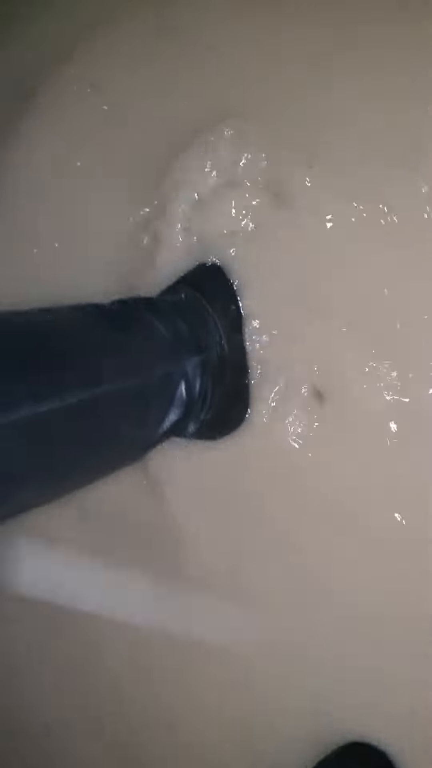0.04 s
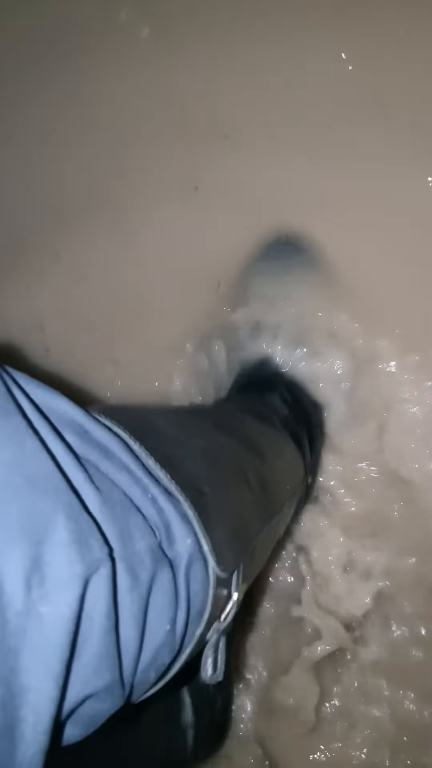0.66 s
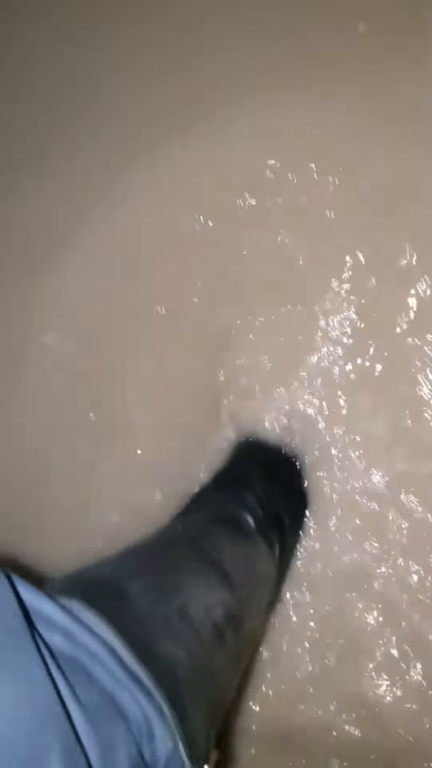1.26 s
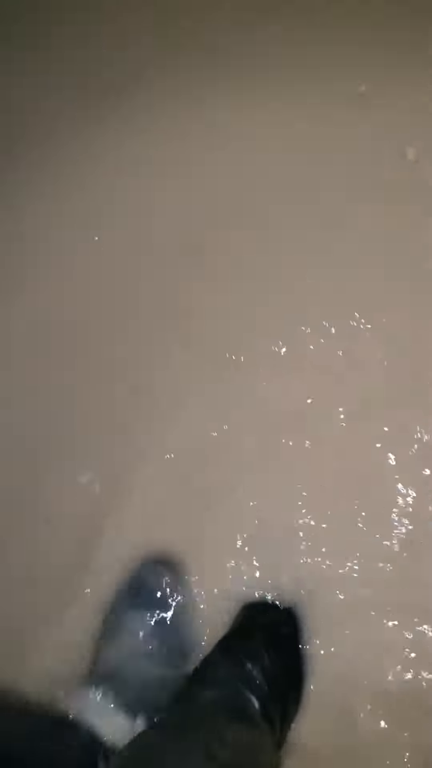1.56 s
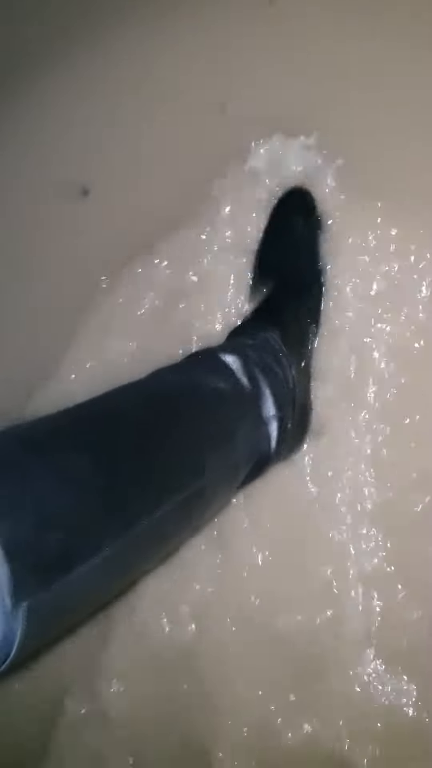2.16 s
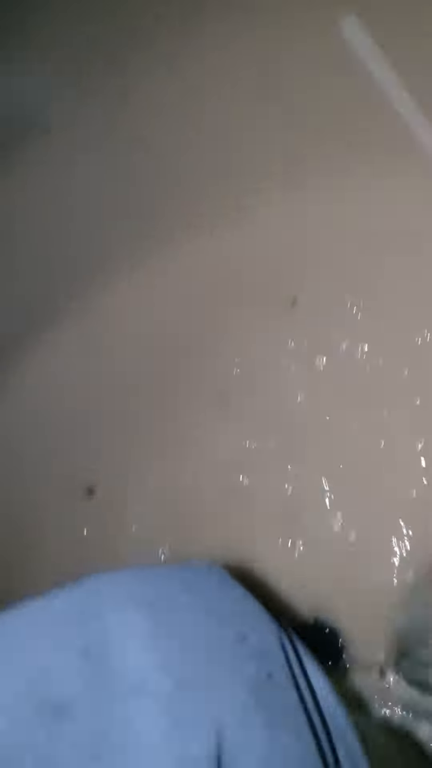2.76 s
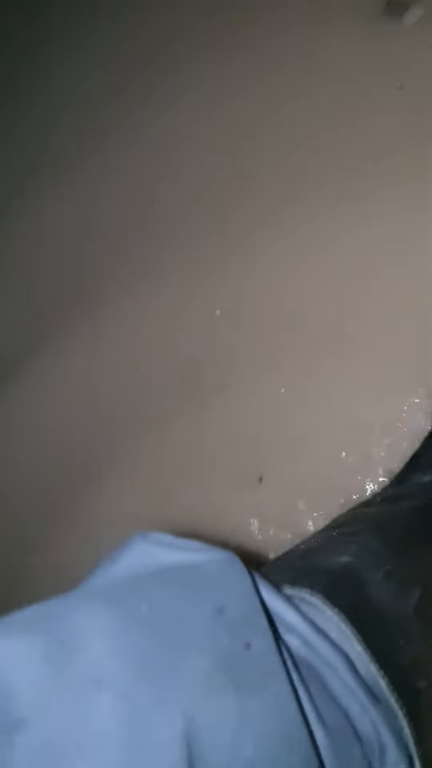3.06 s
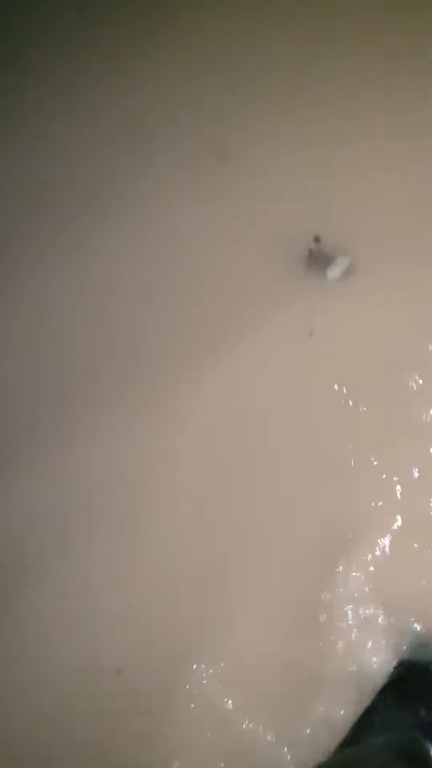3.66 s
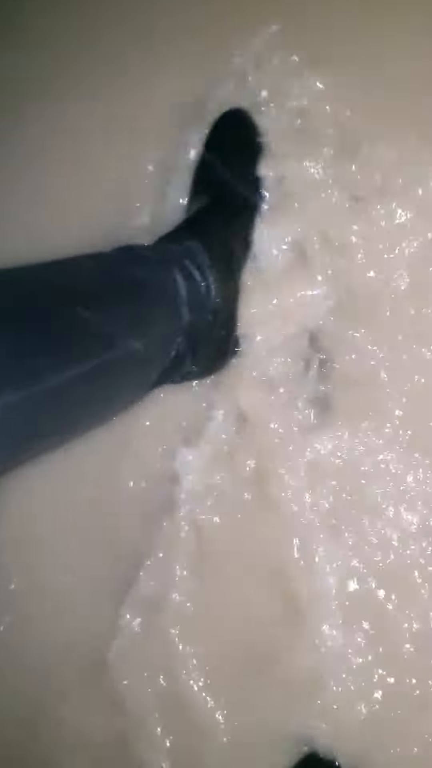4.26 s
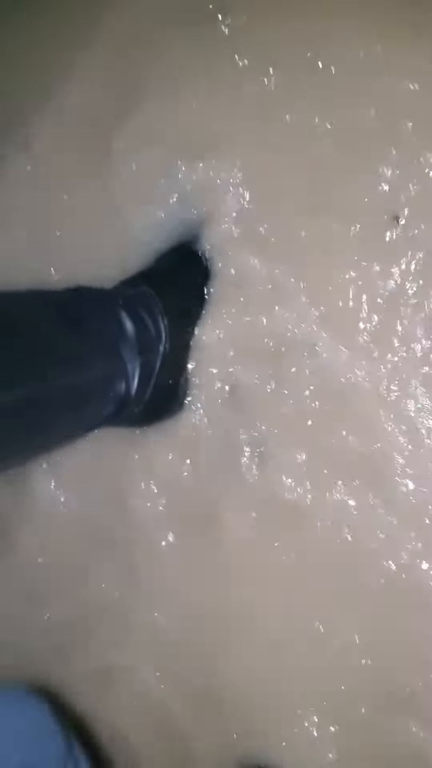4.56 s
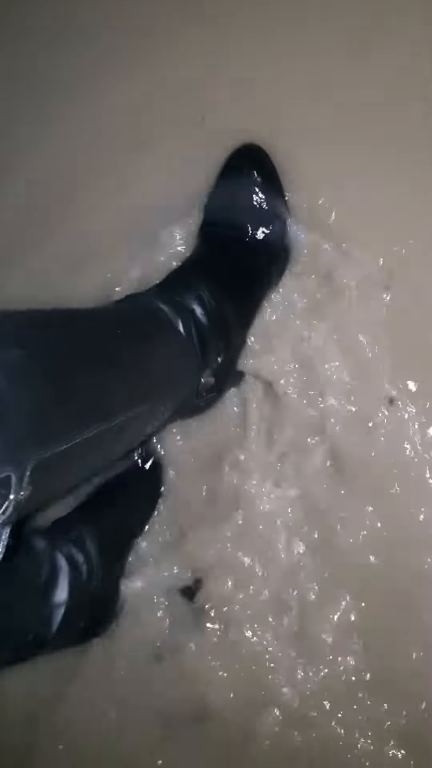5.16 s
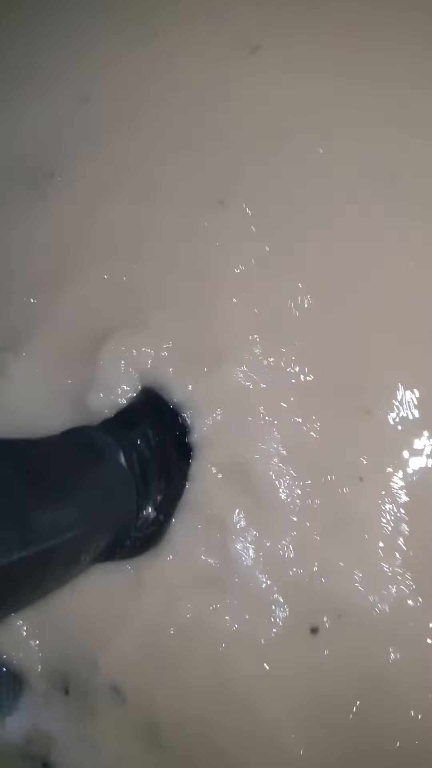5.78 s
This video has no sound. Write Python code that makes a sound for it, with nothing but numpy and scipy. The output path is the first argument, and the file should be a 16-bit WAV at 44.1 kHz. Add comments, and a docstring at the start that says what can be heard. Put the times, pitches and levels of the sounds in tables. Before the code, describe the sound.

A low puff of wind on the microphone opens the sound. Then heeled boots wade through a shallow muddy puddle, heard close from just above. Five strides begin at about 0.3, 1.5, 2.6, 3.7 and 4.8 seconds, each a bubbling slosh of roughly half a second with bright bursts of spray, fading to a trickle. The first is thick with plops, and the strongest splashes come near 1.6, 3 and 4 seconds. Water gulps around the ankles, and drops snap and ping on the surface, with a sharp wet snap near 3.4 seconds. Heels knock dully on the bottom a few times, most clearly at 2.5 seconds. The water settles after about 5.3 seconds, and a softer slosh starts at 6 seconds. Underneath, light wind rumbles in uneven gusts, mostly on the right, over a faint, steady outdoor hiss.

```python
"""A low puff of wind, then heeled boots slosh through a shallow muddy puddle: five strides, heard from
just above. Each stride churns up a swarm of ringing bubbles and flings bursts of spray. Big air pockets
plop, water gulps round the ankle, drops snap and ping on the surface, and heels knock on the bottom.
Behind them, moving air rumbles in the two microphone ports over a faint outdoor hiss."""
import sys
import numpy as np
from scipy import signal
from scipy.fft import rfft, irfft, next_fast_len
from scipy.io import wavfile
from scipy.ndimage import uniform_filter1d

SR = 44100
rng = np.random.default_rng(int(sys.argv[2]) if len(sys.argv) > 2 else 0)


def pcm_store(signal):
    """Save signal as 16-bit PCM."""
    levels = np.round(np.clip(np.atleast_2d(signal), -1, 1) * 32767)
    wavfile.write(sys.argv[1], SR, levels.astype(np.int16).T)


N = 265482
PORT_LAG_S, LAG_SPREAD_S = .0001, .0001  # left port lag: mean, spread with direction


def amp(db):
    """Decibels to gain."""
    return 10 ** (np.asarray(db) / 20)


def unit_rms(x):
    """Scales to rms 1."""
    return x / np.sqrt(np.mean(x ** 2) + 1e-20)


def hiss():
    """Independent white noise at each port."""
    return rng.standard_normal((2, N))


def colour(x, spectrum):
    """Filters by a spectrum: one dB column for both channels, or one each."""
    size = next_fast_len(N + 4096)
    freq_hz, *columns_db = np.transpose(spectrum)
    log_hz = np.log(np.fft.rfftfreq(size, 1 / SR) + 1)
    gain = amp([np.interp(log_hz, np.log(freq_hz), db) for db in columns_db])
    return irfft(rfft(x, size) * gain, size)[:, :N]


def add(mix, start_s, sound, spread_s=0):
    """Places a sound at both ports, the left one offset by direction."""
    for channel, lag_s in zip(mix, (PORT_LAG_S + spread_s * rng.standard_normal(), 0)):
        part = channel[max(round((start_s + lag_s) * SR), 0):][:len(sound)]
        part += sound[:len(part)]


def ring(pitch_hz, t60_s, glide_oct_per_s, onset_cycles=0.45):
    """A damped, gliding sine that swells within a cycle or so."""
    t = np.arange(int(t60_s * SR) + 16) / SR
    hz = np.minimum(pitch_hz * 2 ** (glide_oct_per_s * t), SR / 2)
    envelope = (1 - np.exp(-(t * pitch_hz / onset_cycles) ** 2)) * amp(-60 * t / t60_s)
    return envelope / envelope.max() * np.sin(2 * np.pi * np.cumsum(hz) / SR)


def surges(slowest_hz, fastest_hz):
    """Uneven random swell of rms 1."""
    t = np.arange(N) / SR
    rates_hz = np.geomspace(slowest_hz, fastest_hz, 20)
    return unit_rms(sum(np.sin(2 * np.pi * (hz * t + rng.random())) / np.sqrt(hz) for hz in rates_hz))


def swarm(low_hz, high_hz, busy, per_s, cycles, spread_db, glide_oct, sizes, candidates=1500):
    """Bubbles of many sizes, each from its own direction; sparser where busy is low."""
    out = np.zeros((2, N))
    for hz in np.geomspace(low_hz, high_hz, sizes):
        when, loudness, sign, chance = rng.random((candidates, 4)).T
        lag_s = PORT_LAG_S + LAG_SPREAD_S * rng.standard_normal(candidates)
        t60_s = cycles * 2 ** (2 * rng.random() - 1) / hz
        bubble = ring(hz, t60_s, glide_oct * rng.random() / t60_s)  # pitch climbs near the surface
        share = busy[(when * N).astype(int)]
        born = chance < share * per_s * N / SR / sizes / candidates
        level_db = spread_db * np.minimum(-np.log(loudness), 4)
        strength = born * np.sign(sign - .5) * amp(level_db) / np.sqrt(share)
        arrivals = (when * N + np.array([lag_s * SR, 0 * lag_s])).astype(int) % N
        impulses = np.array([np.bincount(port, strength, N) for port in arrivals])
        gain = np.sqrt(hz / np.sum(strength ** 2) / np.sum(bubble ** 2))
        out += gain * signal.oaconvolve(impulses, bubble[None], axes=1)[:, :N]
    return unit_rms(out)


def stir_power(start_s, length_s, level_db, change_db, shape):
    """Stirred water swells, arches while the boot moves, then drops to a fading trickle."""
    rise_db_per_s, end_dip_db, fall_db_per_s, trickle_db, fade_db_per_s = shape
    t = np.arange(N) / SR - start_s
    before_s, after_s = np.maximum(-t, 0), np.maximum(t - length_s, 0)
    progress = np.clip(t / length_s, 0, 1)
    arch_db = change_db * (progress - .5) - end_dip_db * (2 * progress - 1) ** 2
    tail_db = np.maximum(-fall_db_per_s * after_s, trickle_db - fade_db_per_s * after_s)
    return amp(level_db - rise_db_per_s * before_s + arch_db + tail_db) ** 2


# rise_db_per_s, end_dip_db, fall_db_per_s, trickle_db, fade_db_per_s
SLOSH_SHAPE, SPRAY_SHAPE = (201, 4, 209, -6, 78), (228, 4.5, 153, -6, 60)
# boot drags and waves lapping back: start_s, length_s, slosh_db, spray_db, change_db
DRAGS = [(0.334, 0.58, -34, -35.5, 6), (1.491, 0.51, -32.5, -35.5, -4.5), (2.037, 0.036, -41.5, -41, 8),
         (2.663, 0.43, -35, -36.5, -7), (3.156, 0.25, -43, -44.5, -1), (3.607, 0.12, -52, -45.5, -11),
         (3.757, 0.5, -32.5, -35, -0.5), (4.766, 0.47, -34.5, -36.5, 0), (6.017, 0.28, -37.5, -47, 0)]


def wading(ripple_db=-58.5, fizz_db=-55, slap_db=-2, full_stir_db=-33,
           slosh_surge_db=1, spray_surge_db=1.43):
    """The boot ploughs the water: slosh and spray follow each drag; each burst slaps and crackles."""
    flung_power = burst_power()
    slosh_power = amp(ripple_db) ** 2 + amp(slap_db) ** 2 * flung_power
    spray_power = amp(fizz_db) ** 2  # the puddle never quite rests
    for start_s, length_s, slosh_db, spray_db, change_db in DRAGS:
        slosh_power += stir_power(start_s, length_s, slosh_db, change_db, SLOSH_SHAPE)
        spray_power += stir_power(start_s, length_s, spray_db, change_db, SPRAY_SHAPE)
    stir = np.sqrt(slosh_power)
    surge = surges(14, 90)  # water breaks in quick slaps
    busy = np.clip(stir / amp(full_stir_db), .25, 1)  # harder stirring makes more bubbles
    body = stir * slosh(busy)
    splash = np.sqrt(spray_power) * spray(busy) + np.sqrt(flung_power) * crackle()
    return amp(slosh_surge_db * surge) * body + amp(spray_surge_db * surge) * splash


# slosh spectrum: freq_hz, gain_db
SLOSH_SPECTRUM = [(330, -16.5), (520, -2.5), (900, 4), (1350, 5.5), (2000, 1.5), (2800, -3)]


def slosh(busy):
    """Mid-sized bubbles ring in the churned water."""
    bubbles = swarm(423.7, 3034, busy, per_s=1200, cycles=40, spread_db=3.1, glide_oct=.65, sizes=40)
    return unit_rms(colour(bubbles, SLOSH_SPECTRUM))


# spray spectrum: freq_hz, gain_db
SPRAY_SPECTRUM = [(1300, -6), (2300, 6), (3100, 2.5), (4200, 0.5), (6500, -5), (9500, -7), (12000, -17)]


def spray(busy, mist_db=-5.5):
    """Fine spray: tiny bubbles beside a smooth hiss of mist."""
    bubbles = swarm(1790, 14970, busy, per_s=4000, cycles=34, spread_db=3, glide_oct=.29, sizes=32)
    return unit_rms(colour(bubbles + amp(mist_db) * hiss(), SPRAY_SPECTRUM))


# bursts of spray: start_s, level_db
SPRAY_BURSTS = [(0.322, -37.5), (.552, -33.5), (0.829, -45), (1.47, -36.5), (1.607, -29.5), (1.69, -34),
                (2.657, -33.5), (2.963, -29), (3.736, -41.5), (3.941, -31.5), (4.035, -35.5), (4.927, -35),
                (5.115, -53)]


def burst_power(rise_s=0.0062, t60_s=0.49):
    """The crest at the toe breaks; the flung spray rises quickly and rains back down."""
    power = np.zeros(N)
    for start_s, level_db in SPRAY_BURSTS:
        age_s = np.maximum(np.arange(N) / SR - start_s, 0)
        power += (amp(level_db - 60 * age_s / t60_s) * np.minimum(age_s / rise_s, 1)) ** 2
    return power


# crackle spectrum: freq_hz, gain_db
CRACKLE_SPECTRUM = [(900, 1.5), (2600, 15), (6000, -0.5), (10000, -2), (15000, -15)]


def crackle(spread_db=3, step_samples=44):
    """A sheet of water tears into droplets: bright noise whose strength jumps every millisecond."""
    steps_db = spread_db * rng.standard_normal(N // step_samples + 1)
    strength = np.repeat(amp(steps_db), step_samples)[:N]
    return unit_rms(colour(hiss() * strength, CRACKLE_SPECTRUM))


# large air pockets: start_s, level_db, pitch_hz, t60_s, glide_oct_per_s
AIR_POCKETS = [(0.385, -19.5, 950, 0.0084, -9), (0.412, -18.5, 1260, 0.02, 12),
               (.492, -27, 623, 0.034, -12), (.58, -20, 880, 0.021, -20), (0.6118, -24, 1130, .015, -15),
               (.624, -25, 746, 0.028, -36), (.654, -12, 1240, 0.01, -22), (0.7304, -22.5, 2286, 0.1, 17),
               (0.765, -15, 865, 0.0066, 11), (.784, -25, 987, 0.06, -28), (.789, -16, 3080, 0.016, 1),
               (.825, -19.5, 2850, 0.018, -5), (0.8503, -20.5, 1040, 0.007, -33),
               (.871, -13, 1865, 0.024, 34), (0.914, -32, 525, 0.16, 24), (0.943, -24, 1260, 0.017, 12),
               (1.7985, -28.5, 477, 0.1, 11), (1.959, -23, 528, 0.057, -3), (2.059, -32, 1150, 0.066, -2),
               (2.295, -18.5, 610, 0.0017, -5.5), (2.567, -22, 1950, 0.0067, 12),
               (2.907, -18.5, 3340, 0.018, 5), (3.209, -18.5, 1105, 0.041, -12),
               (3.274, -33.5, 530, 0.11, 14.5), (3.9095, -26.5, 696, 0.058, 18),
               (4.073, -24, 1430, 0.027, -12), (4.152, -24, 605, 0.034, -5),
               (4.247, -29.5, 727, 0.09, 29.5), (5.008, -29, 465, 0.34, 21.5),
               (5.032, -17, 2030, 0.025, 31), (5.114, -18, 1435, 0.065, 53), (5.347, -40, 965, 0.14, 5),
               (5.5219, -14, 2850, 0.0042, -18), (5.706, -41, 1140, 0.058, -2.5),
               (5.9, -39.5, 1350, .05, 7), (5.988, -35, 1050, 0.27, 11)]


def plops():
    """Air pockets pinch off and ring as single large bubbles."""
    out = np.zeros((2, N))
    for start_s, level_db, pitch_hz, t60_s, glide_oct_per_s in AIR_POCKETS:
        add(out, start_s, amp(level_db) * ring(pitch_hz, t60_s, glide_oct_per_s, onset_cycles=1))
    return out


# collapsing folds of water: start_s, length_s, level_db
FOLDS = [(1.475, 0.018, -30.5), (1.533, 0.0083, -28), (1.777, .024, -30), (2.677, .008, -27),
         (2.695, 0.031, -33), (3.365, .06, -43), (3.734, 0.013, -30), (4.923, .012, -29.5),
         (5.039, .07, -36)]


def gurgles(centre_hz=1300, spread_oct=0.7, count=12, cycles=20.4, glide_oct_per_s=18):
    """A wave folds over into a clump of bubbles of like size."""
    out = np.zeros((2, N))
    for start_s, length_s, level_db in FOLDS:
        clump = np.zeros((2, N))
        for turn, (jitter, pitch_draw) in enumerate(rng.random((count, 2))):
            hz = centre_hz * 2 ** (spread_oct * (2 * pitch_draw - 1))
            birth_s = start_s + length_s * (turn + jitter) / count
            add(clump, birth_s, ring(hz, cycles / hz, glide_oct_per_s), LAG_SPREAD_S)
        out += amp(level_db) * np.sqrt(length_s * SR / N) * unit_rms(clump)
    return out


# churn spectrum: freq_hz, gain_db
CHURN_SPECTRUM = [(100, -20), (200, -6), (330, -2.5), (480, -5.5), (700, -2)]
# boot sinking in: start_s, length_s, level_db, deepest_hz
PLUNGES = [(0.576, 0.0094, -41, 150), (1.53, 0.52, -51.5, 394), (2.624, 0.358, -39.5, 170),
           (3.359, 0.094, -45, 397), (4.005, 0.41, -52.5, 416), (4.998, 0.11, -44.5, 565)]


def gulps(change_db=-8, shape=(352, -3, 500, -17, 53)):
    """Water closes round the ankle in big bubbles; the deeper the boot, the lower they reach."""
    bubbles = swarm(152, 572, np.ones(N), per_s=360, cycles=7.4, spread_db=4, glide_oct=.92, sizes=10)
    churn = colour(bubbles, CHURN_SPECTRUM)
    out = np.zeros((2, N))
    for start_s, length_s, level_db, deepest_hz in PLUNGES:
        high_pass = signal.butter(3, deepest_hz, "high", fs=SR, output="sos")
        envelope = np.sqrt(stir_power(start_s, length_s, level_db, change_db, shape))
        out += envelope * unit_rms(signal.sosfilt(high_pass, churn))
    return out


# wet cracks: start_s, level_db, centre_hz, t60_s
WET_CRACKS = [(0.717, -15, 5140, 0.0056), (1.087, -25.5, 2000, 0.0051), (1.7, -19, 5400, 0.0072),
              (2.292, -30.5, 1320, 0.028), (2.411, -22.5, 1380, 0.0043), (3.272, -26, 2120, 0.012),
              (3.392, -9.5, 2330, 0.0053), (3.419, -28, 3200, 0.011), (4.667, -9, 1980, 0.00089),
              (5.084, -18, 2170, 0.015), (5.2171, -19.5, 2380, 0.014), (5.4713, -36.5, 1800, 0.042),
              (5.52, -18.5, 3250, 0.018)]


def snaps(spatter_gain=0.98, band_ratio=1.23, crack_db=-10):
    """Drops and wet leather snap: one impact and a brief spatter through the same resonance."""
    out = np.zeros((2, N))
    t = np.arange(SR // 20) / SR
    for start_s, level_db, centre_hz, t60_s in WET_CRACKS:
        band = signal.butter(1, [centre_hz / band_ratio, centre_hz * band_ratio], "band", fs=SR)
        decay = amp(-60 * t / t60_s)
        spatter = signal.lfilter(*band, rng.standard_normal(len(t)) * decay)
        spatter *= spatter_gain * np.linalg.norm(decay) / np.linalg.norm(spatter)
        crack = signal.lfilter(*band, signal.unit_impulse(len(t)))
        add(out, start_s, amp(level_db) * spatter, LAG_SPREAD_S)
        add(out, start_s, amp(level_db + crack_db) * crack / crack.max(), LAG_SPREAD_S)
    return out


# spray landing close by: start_s, level_db, pitch_hz
NEAR_DROPLETS = [(.3393, -28.5, 9300), (0.3877, -26, 3300), (0.4917, -36, 3220), (.644, -17, 2400),
                 (0.687, -30, 5700), (0.7606, -24, 6120), (.868, -21.5, 4400), (1.6305, -22, 6200),
                 (1.6425, -23, 2800), (1.6585, -23, 5000), (1.8383, -26, 4830), (2.9812, -21, 3600),
                 (3.2143, -33, 6400), (3.258, -27, 5280), (3.7898, -29, 6000), (4.0407, -24, 4300),
                 (4.991, -20.5, 6970), (5.124, -22.5, 6820), (5.2388, -34, 5760)]


def droplets(ping_t60_s=0.012, glide_oct_per_s=12, tick_hz=9500, equal_hz=5000, tick_db_per_oct=10):
    """A droplet ticks on the surface and traps a tiny bubble that pings upward."""
    out = np.zeros((2, N))
    tick = ring(tick_hz, 10 / tick_hz, 0)
    for start_s, level_db, pitch_hz in NEAR_DROPLETS:
        tick_db = level_db + tick_db_per_oct * np.log2(pitch_hz / equal_hz)
        add(out, start_s, amp(tick_db) * tick, LAG_SPREAD_S)
        add(out, start_s, amp(level_db) * ring(pitch_hz, ping_t60_s, glide_oct_per_s), LAG_SPREAD_S)
    return out


# heels meeting the bottom: start_s, level_db, pitch_hz, t60_s
HEEL_KNOCKS = [(.48, -30.5, 240, 0.046), (0.564, -29, 293, 0.098), (1.889, -33.5, 270, 0.011),
               (2.483, -11, 288, 0.016), (4.031, -30, 193, 0.12)]


def heels(sag_oct_per_s=110):
    """A dull knock whose pitch sags as the heel beds into the mud."""
    out = np.zeros((2, N))
    for start_s, level_db, pitch_hz, t60_s in HEEL_KNOCKS:
        add(out, start_s, -amp(level_db) * ring(pitch_hz, t60_s, -sag_oct_per_s, onset_cycles=0.35))
    return out


def with_scatter(x, near_db=-12, near_t60_s=0.058, far_db=-21, far_t60_s=0.27):
    """Adds quick scatter off legs and water, and a faint open-air tail."""
    t = np.arange(SR // 2) / SR
    response = 0
    for level_db, t60_s in ((near_db, near_t60_s), (far_db, far_t60_s)):
        taps = rng.standard_normal((2, len(t))) * amp(-60 * t / t60_s) * (t > .001)
        response += amp(level_db) * taps / np.linalg.norm(taps, axis=1, keepdims=True)
    return x + signal.fftconvolve(x, response, axes=1)[:, :N]


# eddy spectrum: freq_hz, gain_db
EDDY_SPECTRUM = [(22, -33), (40, -1.5), (60, 9.5), (83, 8), (110, 1.5), (165, -5), (230, -11.5),
                 (500, -33.5)]
# air brushing the ports: peak_s, sigma_s, left_db, right_db, cutoff_hz
PORT_GUSTS = [(0.048, 0.12, -56, -28.5, 168), (0.83, 0.083, -70, -29.5, 97), (1.286, 0.14, -60.5, -29, 296),
              (2.332, 0.074, -38, -28.5, 111), (2.573, 0.13, -50, -21, 184), (3.44, 0.21, -51, -26.5, 207),
              (3.95, 0.71, -50, -32, 135), (4.572, 0.11, -48, -26.5, 305), (4.868, 0.35, -39.5, -73, 89),
              (5.34, 0.058, -32.5, -45, 129), (5.869, 0.074, -60, -29, 140)]


def wind(buffet_db=4, breeze_left_db=-52, breeze_right_db=-41.5, breeze_cutoff_hz=116):
    """Low eddies, unrelated at the two ports; each gust is a bell-shaped swell over the breeze."""
    t = np.arange(N) / SR
    eddies = colour(hiss(), EDDY_SPECTRUM) * amp(buffet_db * surges(6, 25))

    def blow(left_db, right_db, cutoff_hz):
        """Low-passed eddies at a steady strength."""
        shifted = np.roll(eddies, rng.integers(N), axis=1)
        low = signal.sosfilt(signal.butter(2, cutoff_hz, fs=SR, output="sos"), shifted)
        running_rms = np.sqrt(uniform_filter1d(low ** 2, size=SR // 8, axis=1) + 1e-12)
        return amp([[left_db], [right_db]]) * low / running_rms

    gusts = np.zeros((2, N))
    for peak_s, sigma_s, left_db, right_db, cutoff_hz in PORT_GUSTS:
        gusts += np.exp(-.5 * ((t - peak_s) / sigma_s) ** 2) * blow(left_db, right_db, cutoff_hz)
    return gusts + blow(breeze_left_db, breeze_right_db, breeze_cutoff_hz)


# outdoor hiss spectrum: freq_hz, gain_db
AIR_SPECTRUM = [(500, -6), (1200, -12), (2500, -6.5), (6500, -15), (10000, -14), (16000, -23.5)]


def outdoor_air(left_db=-51.5, right_db=-56):
    """Faint, steady outdoor hiss."""
    return amp([[left_db], [right_db]]) * unit_rms(colour(hiss(), AIR_SPECTRUM))


def scene():
    """Water and heels over wind and outdoor hiss."""
    air = outdoor_air()
    water = wading() + gulps() + with_scatter(plops() + gurgles() + snaps() + droplets())
    return water + heels() + wind() + air


# port response: freq_hz, left_db, right_db
PORT_RESPONSE = [(196, 4, 1.5), (536, 3.5, 2), (1300, 2, -2), (2000, -1, -9), (2760, -1.5, -5.5),
                 (3590, 0, -5.5), (5580, 1.5, -6), (6750, 7, -9), (7550, -6, -7), (9760, -1.5, 1),
                 (11000, -3, 0), (12600, 2.5, 3.5), (15500, 2, -1.5)]


def record(dry, cutoff_hz=16000):
    """Each port colours the sound; a steep low-pass limits the band."""
    low_pass = signal.firwin(511, cutoff_hz, window=("kaiser", 9), fs=SR)
    return signal.oaconvolve(colour(dry, PORT_RESPONSE), low_pass[None], "same")


dry = scene()
out = record(dry)
pcm_store(out)
```